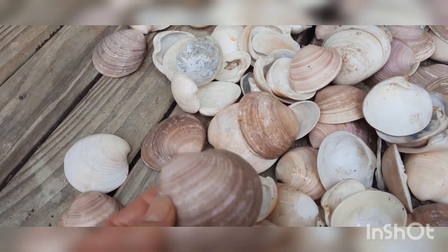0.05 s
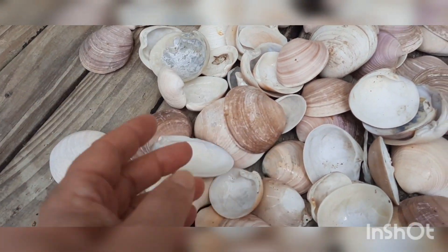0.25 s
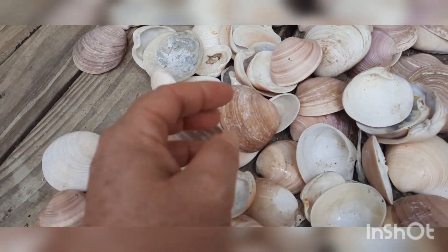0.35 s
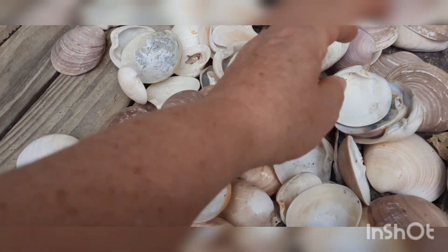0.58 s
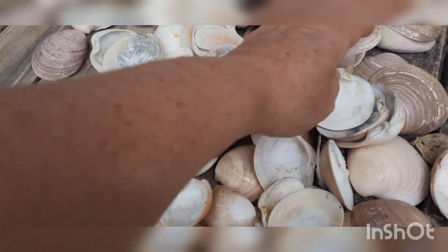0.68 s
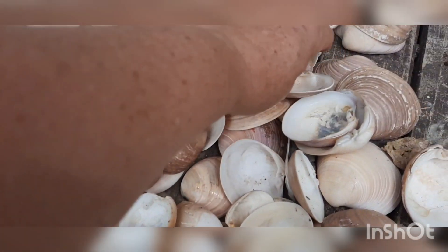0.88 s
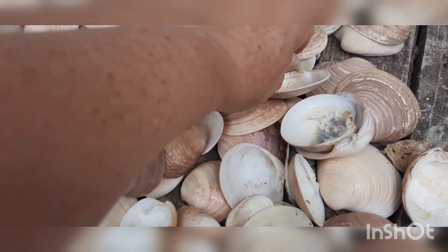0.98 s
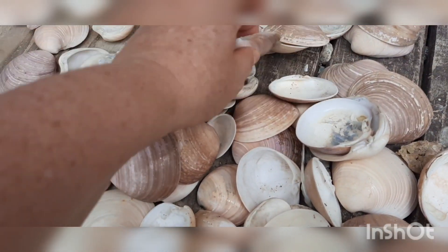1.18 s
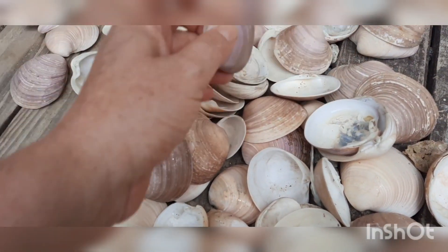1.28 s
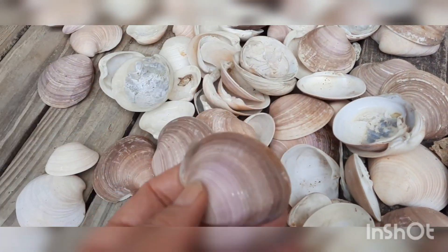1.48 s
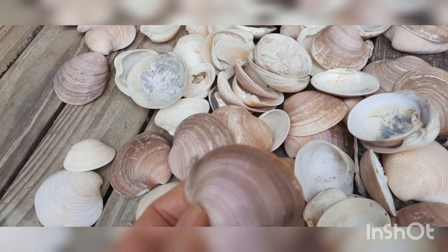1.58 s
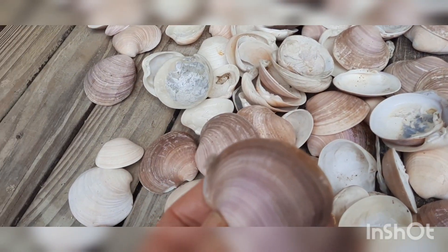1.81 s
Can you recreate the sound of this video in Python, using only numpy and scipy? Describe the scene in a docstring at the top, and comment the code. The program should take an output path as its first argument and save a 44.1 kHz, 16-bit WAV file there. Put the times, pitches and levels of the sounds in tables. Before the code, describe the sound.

Dry seashells clink, clatter and rasp close by as a hand moves them on wood.

```python
"""A clam shell drops on a heap of dry shells on a wooden deck and bounces to rest, close by.
Each impact cracks, excites the shell's damped modes and knocks the boards underneath.
A hand nudges a few shells and drags one out: stick-slip friction makes its ribbed rim rasp and sing
as it clinks along its neighbours. The planks thud; behind lie a short echo, a low hum and outdoor air."""
import sys
import numpy as np
from scipy import signal
from scipy.fft import rfft, irfft
from scipy.io import wavfile

SR = 44100
rng = np.random.default_rng(int(sys.argv[2]) if len(sys.argv) > 2 else 0)


def output_pcm(signal):
    """Save a mono or channel-first signal as 16-bit PCM at the path in sys.argv[1].

    Samples are clipped to [-1, 1] before scaling.
    """
    pcm = np.clip(np.atleast_2d(signal).T, -1, 1) * 32767
    wavfile.write(sys.argv[1], SR, np.round(pcm).astype(np.int16))


N = 81585
T = np.arange(N) / SR
RING_T = T[:N // 5]
CONTACT_S, BOARD_SCATTER_DB, HEAP_PAN_DB = 0.0005, 3.5, -1

# rim scraping over its neighbours (time [s], level [dB])
SCRAPE_LEVEL = [(.76, -67.5), (.86, -42), (.875, -24.5), (.94, -23.5), (.958, -28), (.975, -52),
                (1.02, -30.5), (1.062, -33), (1.085, -22.5), (1.15, -36), (1.195, -28), (1.255, -32.5),
                (1.295, -40.5), (1.32, -36), (1.368, -26), (1.395, -52), (1.5, -82.5)]


def undb(db):
    """Amplitude grows tenfold per 20 dB."""
    return 10 ** (np.asarray(db) / 20)


def unit(x):
    """Normalisation to rms 1."""
    return x / np.sqrt(np.mean(x ** 2))


def curve(points):
    """Amplitude envelope through (time [s], level [dB]) points."""
    return undb(np.interp(T, *np.array(points).T))


def pan(db):
    """Level difference, left over right, sets direction."""
    return undb(np.array([[db], [-db]]) / 2)


def fade(t60, rise=CONTACT_S):
    """Damping: after a quick rise, a fall of 60 dB in t60 seconds."""
    return (1 - np.exp(-RING_T / rise)) * np.exp(-np.log(1000) * RING_T / t60)


def add(out, start, sound):
    """Superposition: a sound joins the mix at its time."""
    i = int(start * SR)
    out[:, i:i + sound.shape[1]] += sound[:, :N - i]


def convolve(x, response):
    """Convolution: each sample launches an impulse response."""
    return signal.fftconvolve(x, response, axes=1)[:, :N]


def high_pass(x, hz):
    """A Butterworth filter cuts the bass."""
    return signal.sosfilt(signal.butter(3, hz, "high", fs=SR, output="sos"), x)


def noise(colour, size, tilt_db=0, peaks_db=0):
    """Spectrally shaped noise with optional chance resonances; the channels cohere only in the bass."""
    coherence_hz, peak_width_hz = 1250, 260
    hz, db = np.array(colour).T
    bins = np.fft.rfftfreq(size, 1 / SR)
    octaves = np.log2(np.maximum(bins, 1))
    grid = np.arange(0, SR / 2, peak_width_hz)
    peaks = peaks_db * np.interp(bins, grid, rng.standard_normal(len(grid))) * bins / (bins + coherence_hz)
    tilt = tilt_db * np.maximum(octaves - np.log2(1000), 0)  # per octave above 1 kHz
    gain = undb(np.interp(octaves, np.log2(hz), db, left=-90) + tilt + peaks)
    white = rfft(rng.standard_normal((3, size)))
    shared = 0.78 / (1 + (bins / coherence_hz) ** 2)
    spectrum = np.sqrt(shared) * white[0] + np.sqrt(1 - shared) * white[1:]
    return unit(irfft(spectrum * gain, size))


def ring(modes, spread=0.94, scatter_db=4, rise=CONTACT_S):
    """Free vibration is a sum of damped modes; each blow draws new weights and left-right phases."""
    out = 0
    for hz, db, t60 in modes:
        size, turn = rng.standard_normal(2)
        phase = spread * turn * np.array([[1], [-1]])
        out = out + undb(db + scatter_db * size) * np.sin(2 * np.pi * hz * RING_T + phase) * fade(t60, rise)
    return out / np.sqrt(sum(undb(db) ** 2 for _, db, _ in modes) / 2)


def background(hum_hz=97.1):
    """Narrow-band noise wavers as a hum; broadband noise gives outdoor air and fingers rubbing a shell."""
    # envelopes (time [s], level [dB])
    hum_level = [(0, -54.5), (.65, -51.5), (1.35, -60), (1.5, -87.5)]
    air_level = [(0, -58), (.15, -60), (1.35, -50.5), (1.5, -74.5), (1.62, -77.5), (1.72, -72)]
    rub_level = [(1.66, -89), (1.71, -70.5), (1.755, -60.5), (1.79, -69.5), (1.85, -77)]
    # spectra (frequency [Hz], level [dB])
    air_colour = [(25, -8), (55, -0.5), (90, 3.5), (150, -8.5), (2500, -52), (7000, -33.5), (15000, -45.5)]
    rub_colour = [(300, -6), (620, 0), (790, 11.5), (950, -6), (2000, -9.5), (3600, -1.5), (14000, -21.5)]
    hum_colour = [(hum_hz * 0.62, -35), (hum_hz, 0), (hum_hz * 1.25, -35), (hum_hz * 4, -90)]
    hum = curve(hum_level) * noise(hum_colour, N)
    air = curve(air_level) * noise(air_colour, N)
    rub = curve(rub_level) * noise(rub_colour, N)
    return hum + air + rub


def echo(x, low_t60=0.31, high_t60=0.3, far_db=-16.5, near_db=-11):
    """Reflection: quick scatter off the deck, then a yard tail whose treble dies slightly sooner."""
    # spectrum of the tail (frequency [Hz], level [dB])
    tail_colour = [(120, -2.5), (320, 8), (700, 7), (1500, 3), (4500, -2.5), (9000, -9), (16000, -6)]
    tail = noise(tail_colour, N)
    low = signal.sosfiltfilt(signal.butter(2, 2200, fs=SR, output="sos"), tail)
    decay = -np.log(1000) * T
    far = low * np.exp(decay / low_t60) + (tail - low) * np.exp(decay / high_t60)
    near = rng.standard_normal((2, len(RING_T))) * fade(t60=0.07, rise=0.02)
    return sum(undb(db) * convolve(x, unit(response) / np.sqrt(response.shape[1]))
               for db, response in [(far_db, far), (near_db, near)])


def ports(x):
    """The two microphone ports differ in frequency response to close sounds."""
    # left port over right (frequency [Hz], level difference [dB])
    port_balance = [(450, 4), (1300, 5), (2400, 7), (4200, -0.5), (8500, -8.5), (12500, 0)]
    hz, db = np.array(port_balance).T
    balance = np.interp(np.log(np.fft.rfftfreq(2 * N, 1 / SR) + 1), np.log(hz), db)
    gains = undb(np.array([balance, -balance]) / 2)
    return irfft(rfft(x, 2 * N) * gains, 2 * N)[:, :N]


def deck():
    """Heavier contacts drive low, strongly damped modes of the planks."""
    # thuds (time [s], level [dB], pitch [Hz], pan [dB])
    thuds = [(0.25, -22.5, 75.5, 4), (0.282, -28.5, 81, -11), (0.941, -28.5, 94.5, -17),
             (1.132, -26.5, 89.9, -19.5), (1.236, -39, 97.6, -24.5), (1.303, -16.5, 288, -8.5),
             (1.306, -17.5, 147.4, -18.5), (1.314, -24.5, 78.8, -17.5)]
    out = np.zeros((2, N))
    for start, db, hz, pan_db in thuds:
        t60 = 0.062 * np.sqrt(75 / hz)  # higher thuds die sooner
        modes = [(hz * 0.58, -4, t60), (hz, 0, t60), (hz * 1.5, -4, t60 / 2), (hz * 3.0, -7, t60 / 2)]
        thud = ring(modes, spread=0.9, scatter_db=BOARD_SCATTER_DB, rise=0.0017)
        add(out, start, undb(db) * pan(pan_db) * thud)
    return out


def knock():
    """Resonance of the board: a hollow note swells just after a blow."""
    # board modes (frequency [Hz], level [dB], t60 [s])
    board_modes = [(325.2, -1, 0.082), (355, -8, .05), (681, -7.5, .05)]
    return ring(board_modes, spread=0.23, scatter_db=BOARD_SCATTER_DB, rise=0.0024)


def crack(colour, tilt_db, t60):
    """Impact transient: a hard tick dies into a blur of overlapping modes."""
    tick = undb(3.5) * fade(t60=0.003, rise=CONTACT_S / 2)
    return noise(colour, len(RING_T), tilt_db, peaks_db=4.5) * (fade(t60) + tick)


def touch(crack_db, tilt_db, ringing):
    """Collision of two shells: a crack, their ring and a knock on the board below."""
    # contact spectrum (frequency [Hz], level [dB])
    clink_colour = [(400, 1), (900, -3.5), (1600, -0.5), (3200, -3.5), (5300, 3.5), (7400, -4.5),
                    (10000, -8), (16000, -18.5)]
    contact = undb(crack_db) * crack(clink_colour, tilt_db, t60=0.039)
    knock_db = crack_db - 17 - 1.7 * tilt_db  # duller contacts knock harder
    return pan(HEAP_PAN_DB) * (contact + ringing) + undb(knock_db) * knock()


def chinks(per_s=110, low_hz=1935, high_hz=12800):
    """Small shells jostled by the scrape each ring at four natural frequencies of their own."""
    out = np.zeros((2, N))
    for k, (delay, size, *notes) in enumerate(rng.random((150, 6))):
        start = SCRAPE_LEVEL[0][0] + (k + delay) / per_s
        if start < SCRAPE_LEVEL[-1][0]:
            modes = [(low_hz * (high_hz / low_hz) ** note, 0, 0.025) for note in notes]
            add(out, start, size / 2 * ring(modes))
    return undb(7) * pan(HEAP_PAN_DB) * curve(SCRAPE_LEVEL) * out


def scrape(catches_per_s=1800, sing_hz=8610, sing_t60=0.024):
    """Stick-slip friction: the ribbed rim's dense, uneven catches rasp and set the lifted shell singing."""
    # singing relative to the rasp (time [s], level [dB])
    sing_level = [(.87, -19), (.945, -3.5), (.99, -33), (1.33, -20)]
    caught = rng.random((1, N)) < catches_per_s / SR
    catches = caught * undb(5.5 * np.clip(rng.standard_normal(N), -2, 2))
    grain_power = convolve(catches ** 2, fade(t60=0.0035, rise=0.0001)[None])
    # rasp spectrum (frequency [Hz], level [dB])
    rasp_colour = [(250, -1.5), (330, 12.5), (480, -6), (1000, -2.5), (1500, 3.5), (3200, -1), (5500, 4),
                   (8500, -1), (10000, -18), (12000, -1), (15500, -20.5)]
    rasp = unit(np.sqrt(np.abs(grain_power)) * noise(rasp_colour, N))
    kicks = catches * rng.choice([-1, 1], N)
    sing = unit(convolve(kicks, ring([(sing_hz, 0, sing_t60)])))
    return curve(SCRAPE_LEVEL) * (pan(-1) * rasp + pan(-15.5) * curve(sing_level) * sing)


def heap():
    """Collisions excite modes: shells clink, the lifted one chimes, and one rocks dully on the wood."""
    # shells touching (time [s], crack [dB], tilt [dB/octave], ring [dB], three notes [Hz])
    clinks = [(0.3191, -23, -1.5, -15, 5124, 3854, 9470), (.424, -17.5, -0.5, -15.5, 5135, 3843, 10290),
              (0.4296, -27, -4, -16, 5124, 1819, 10290), (.531, -20, -.5, -17.5, 8871, 4870, 9560),
              (.5427, -11, 0.5, -14.5, 2422, 5781, 10314), (.6544, -20.5, -4.5, -30.5, 1905, 5297, 9390),
              (.686, -31, -2.5, -28.5, 2379, 4618, 9420), (.8263, -31, -6, -32.5, 4823, 8764, 11140),
              (0.8678, -16, 6, -19.5, 8268, 4974, 14394), (.886, -31, -1.5, -24, 4155, 1313, 9020),
              (0.9885, -15, 0.5, -17, 3563, 5953, 10680), (1.004, -30.5, -2, -30.5, 5006, 3391, 11490),
              (1.0185, -21, 1.5, -22, 6040, 5340, 9020), (1.072, -14, 0.5, -18, 4640, 5577, 10583),
              (1.08, -18, 2, -23, 4791, 2490, 12779), (1.165, -17.5, 3, -12.5, 4200, 6223, 9496),
              (1.1741, -19, 8, -18.5, 6223, 4898, 10045), (1.189, -23.5, 2.5, -22.5, 1450, 5932, 9905),
              (1.2021, -16.5, 5, -19.5, 5921, 6492, 9700), (1.275, -22.5, 1.5, -28.5, 6201, 2853, 10594),
              (1.345, -28.5, -0.5, -25, 4597, 2196, 11864)]
    # a clink's first, second and treble note (level [dB])
    note_levels = [2.5, -2, -11]
    # blows on the lifted shell (time [s], crack [dB], tilt [dB/octave], ring [dB])
    chimes = [(0.945, -26, -11.5, -22.5), (1.1307, -17, 11, -14), (1.236, -14, 5, -15),
              (1.3025, -15, -2.5, -15.5), (1.315, -17.5, 3.5, -9.5), (1.3572, -21.5, 9.5, -20.5),
              (1.38, -36.5, 0, -24)]
    # its modes (frequency [Hz], level [dB], t60 [s])
    lifted_modes = [(1527, -17.5, .07), (3640, -15, 0.11), (4557, -18.5, 0.03), (5500, -4, .048),
                    (5610, -7.5, .035), (6100, -3.5, .018), (8060, -3.5, 0.036), (8584, 1, 0.032),
                    (11340, -12, .05), (11930, -3.5, .028), (14020, -12.5, .035), (14480, -11.5, 0.035)]
    # rocking contacts (time [s], level [dB])
    rocks = [(0.762, -34), (.769, -30), (.777, -23.5)]
    # their spectrum (frequency [Hz], level [dB])
    rock_colour = [(400, -7.5), (700, 3), (1100, 0), (1500, -10.5), (8000, -41.5)]
    out = np.zeros((2, N))
    for start, crack_db, tilt_db, ring_db, *notes in clinks:
        modes = [(hz, db, 0.033) for hz, db in zip(notes, note_levels)]
        add(out, start, touch(crack_db, tilt_db, undb(ring_db) * ring(modes, scatter_db=5)))
    for start, crack_db, tilt_db, ring_db in chimes:
        add(out, start, touch(crack_db, tilt_db, undb(ring_db) * ring(lifted_modes)))
    for start, db in rocks:
        add(out, start, undb(db) * noise(rock_colour, len(RING_T)) * fade(t60=0.057))
    return out


def dropped_shell():
    """Impact excitation: each bounce cracks, rings the shell's modes and knocks the board."""
    # impacts (time [s], crack [dB], tilt [dB/octave], ring [dB], knock [dB], pan [dB])
    bounces = [(0.2477, -11, 0, -11, -17.5, -4.5), (.2790, -11, -3.5, -14, -23.5, 4.5),
               (0.3105, -11.5, 0, -21.5, -21.5, -6), (0.3914, -10.5, -0.5, -17.5, -16.5, -1.5),
               (0.4194, -16, -2, -19.5, -33.5, 2.5)]
    # contact spectrum (frequency [Hz], level [dB])
    bounce_colour = [(400, 0.5), (900, -8.5), (1700, 6.5), (3000, -6.5), (5500, 3.5), (9500, -14),
                     (12000, -14.5), (16000, -18)]
    # shell modes (frequency [Hz], level [dB], t60 [s])
    shell_modes = [(1682, -4, .04), (1784, -10, 0.07), (2658, -2, .03), (3774, -2.5, .056),
                   (3970, 0, 0.076), (4600, -7, 0.023), (5500, -15.5, .035), (6800, -6.5, 0.059),
                   (8930, -1.5, 0.032), (9600, -5, 0.021)]
    out = np.zeros((2, N))
    for start, crack_db, tilt_db, ring_db, knock_db, pan_db in bounces:
        contact = undb(crack_db) * crack(bounce_colour, tilt_db, t60=0.038)
        ringing = undb(ring_db) * ring(shell_modes)
        add(out, start, pan(pan_db) * (contact + ringing) + undb(knock_db) * knock())
    return out


def scene():
    """Superposition of the shells' direct sound, their echo, the deck and the background."""
    shells = high_pass(dropped_shell() + heap() + scrape() + chinks(), hz=243)
    return high_pass(ports(shells) + echo(shells) + deck() + background(), hz=48)


def record(dry, top_hz=16200):
    """Hard clipping limits the highest peaks; a low-pass filter cuts the top."""
    low_pass = signal.ellip(8, 0.2, 70, top_hz, fs=SR, output="sos")
    return signal.sosfilt(low_pass, np.clip(dry, -0.8, 0.8))


dry = scene()
out = record(dry)
output_pcm(out)
```